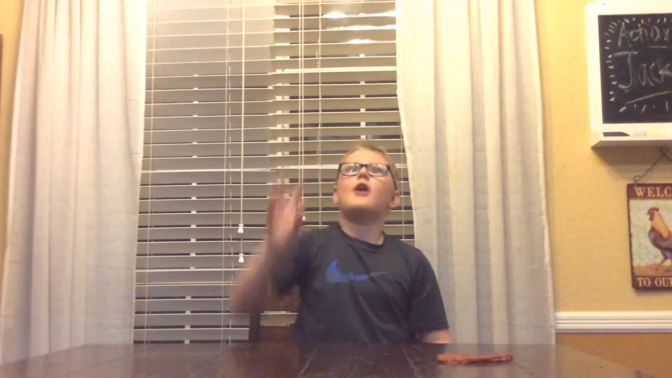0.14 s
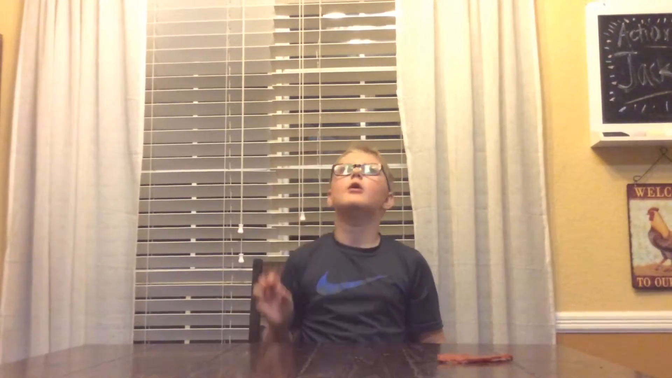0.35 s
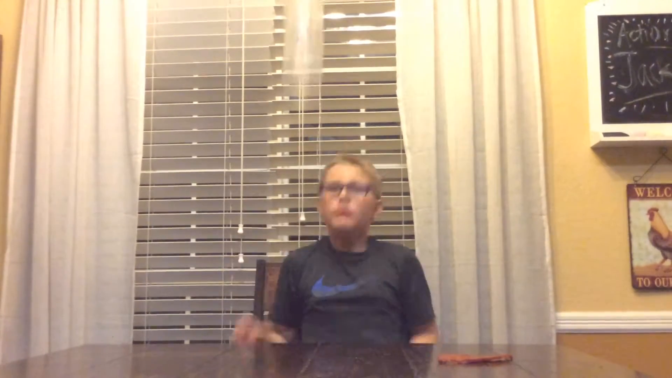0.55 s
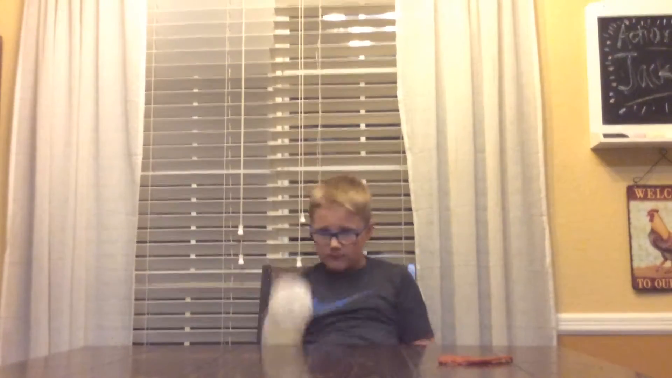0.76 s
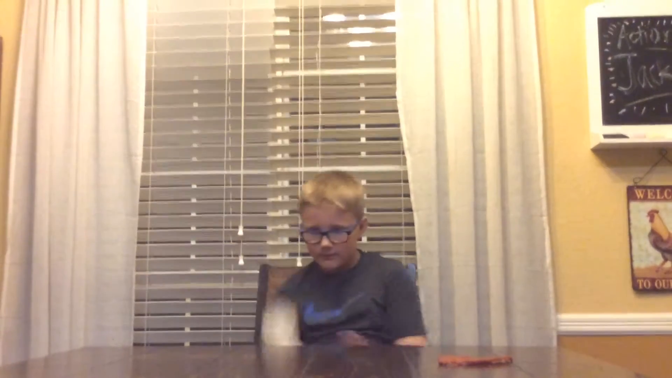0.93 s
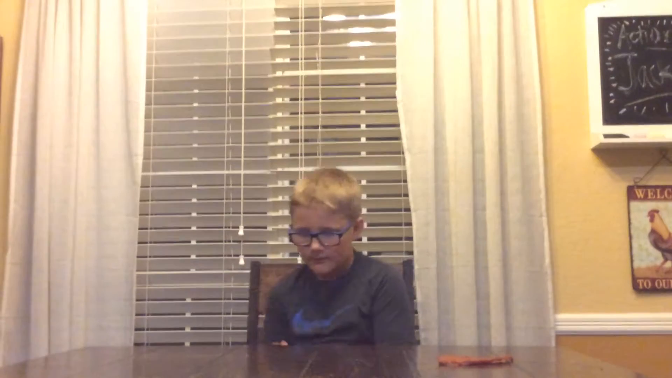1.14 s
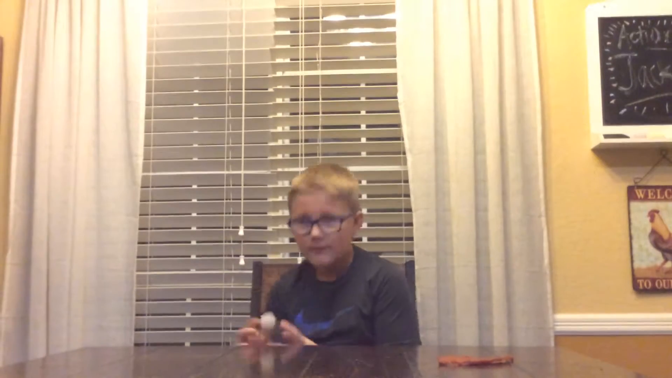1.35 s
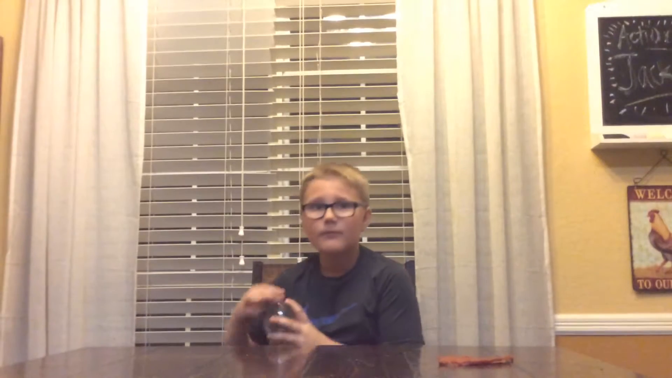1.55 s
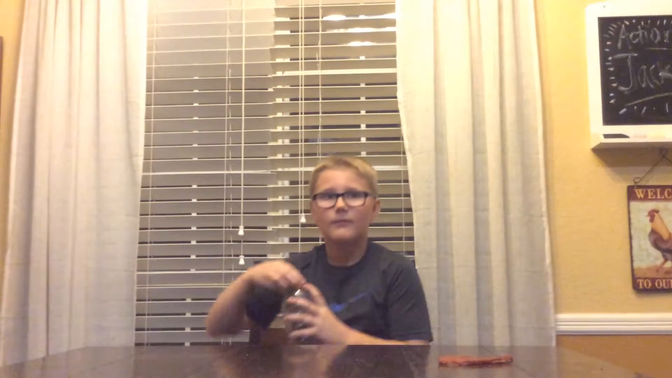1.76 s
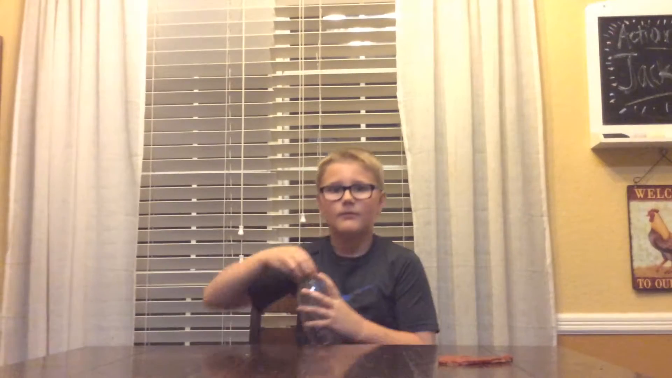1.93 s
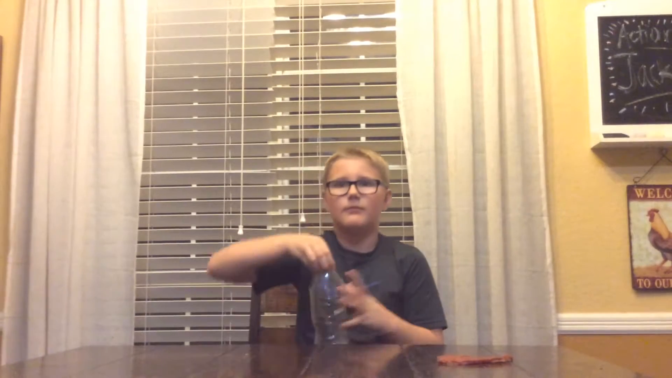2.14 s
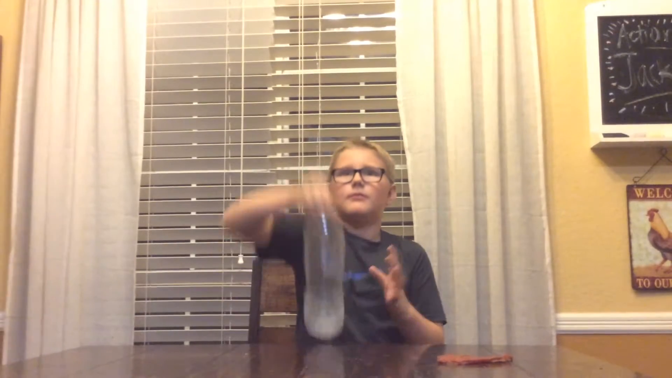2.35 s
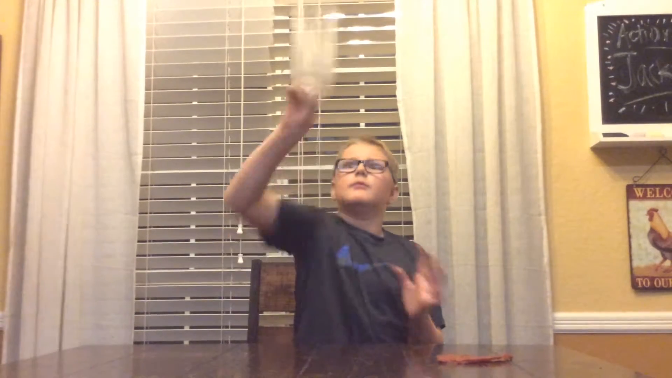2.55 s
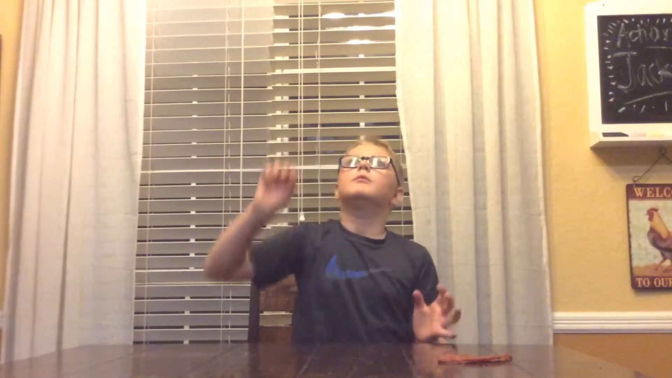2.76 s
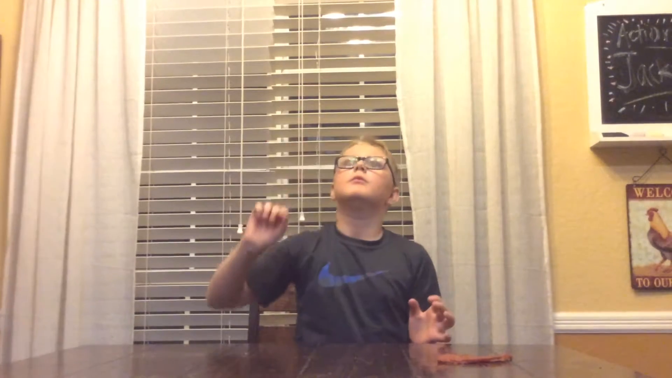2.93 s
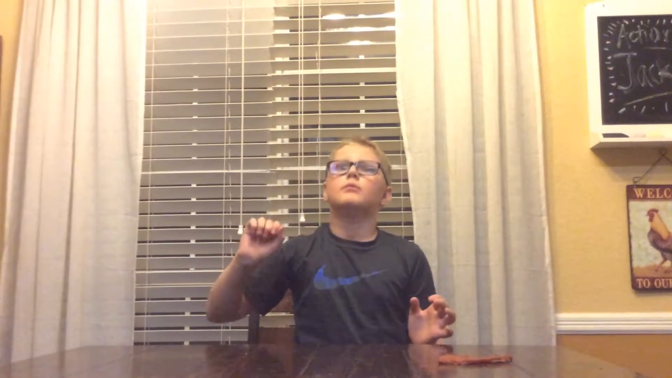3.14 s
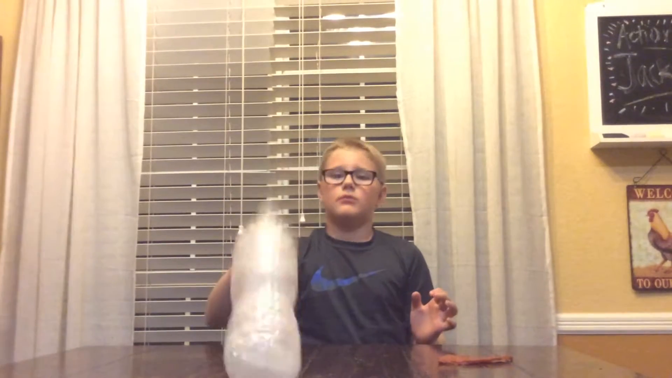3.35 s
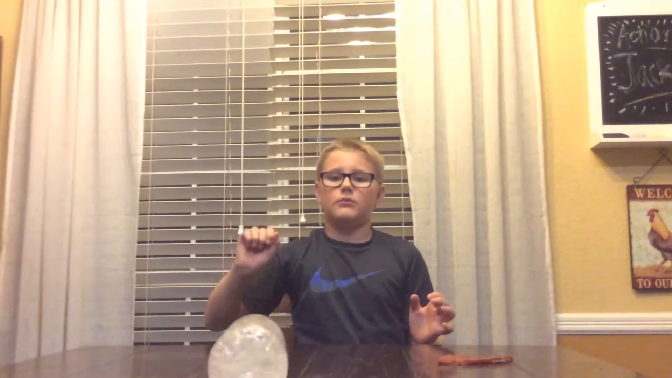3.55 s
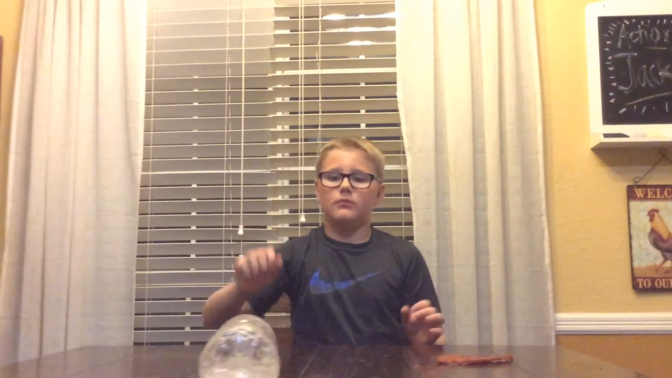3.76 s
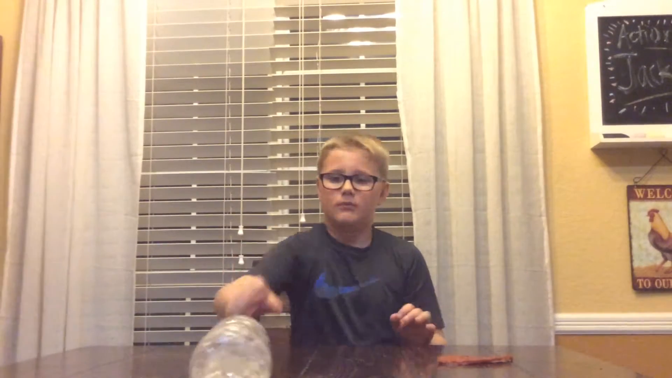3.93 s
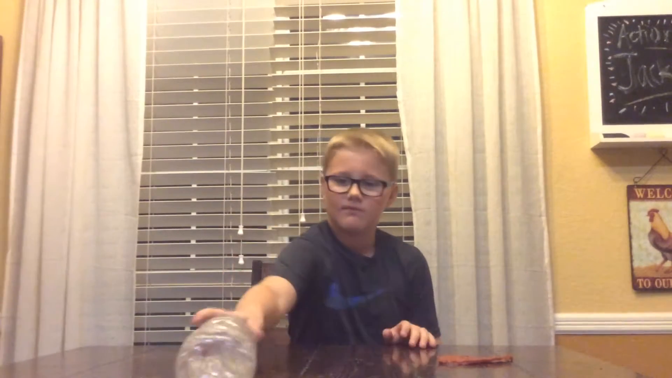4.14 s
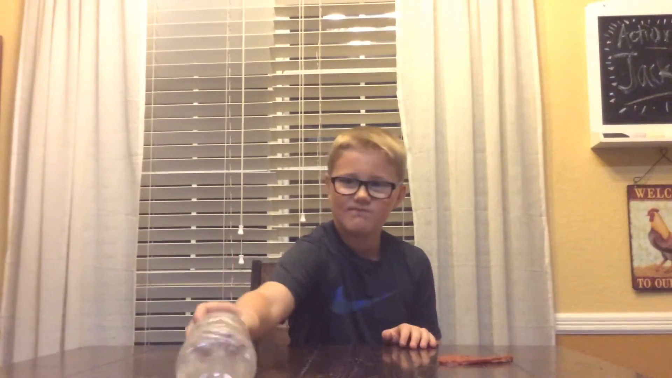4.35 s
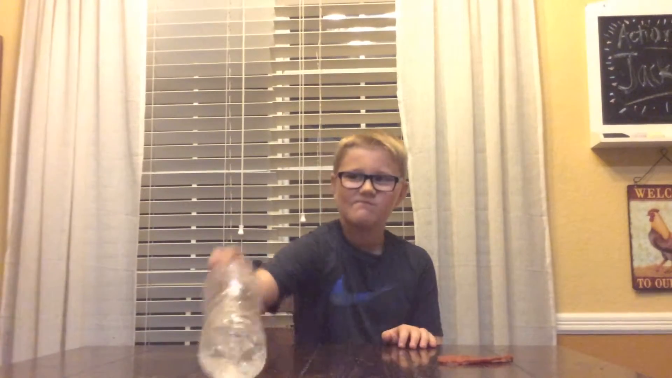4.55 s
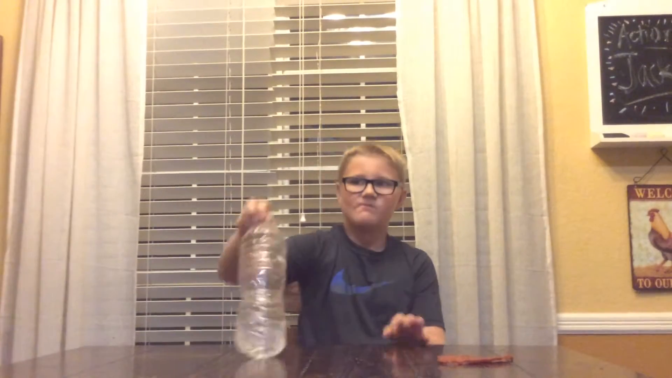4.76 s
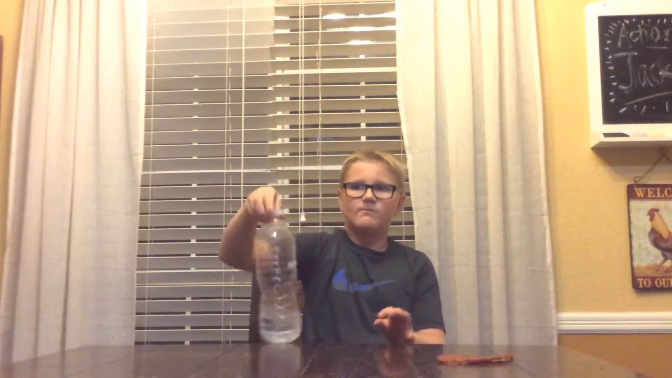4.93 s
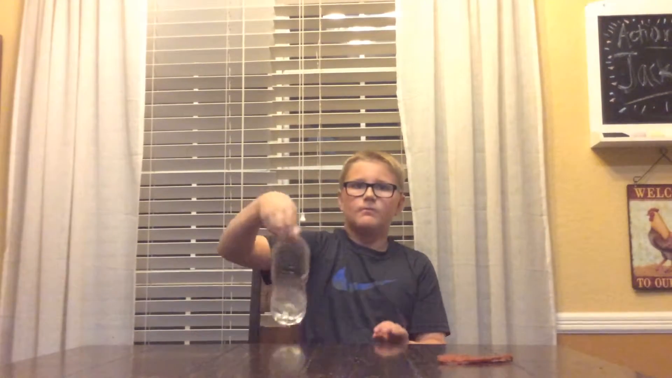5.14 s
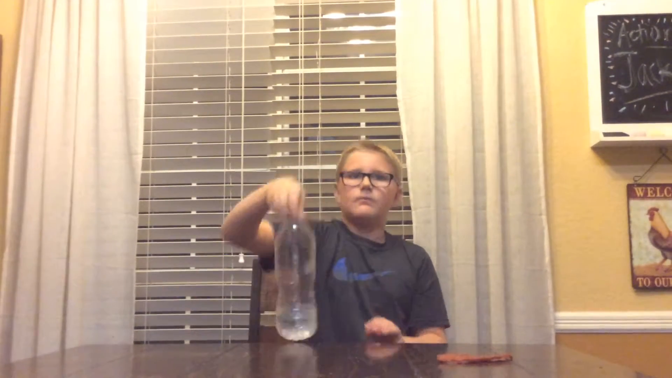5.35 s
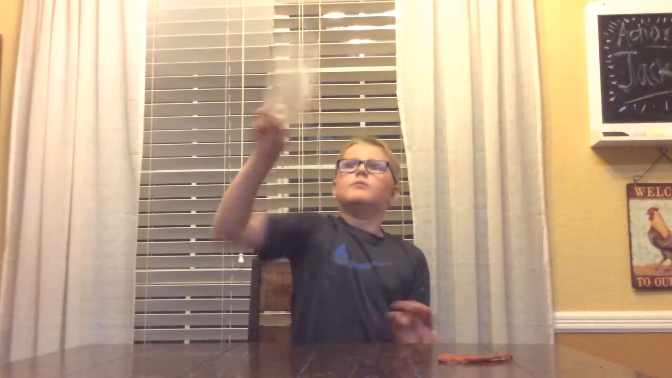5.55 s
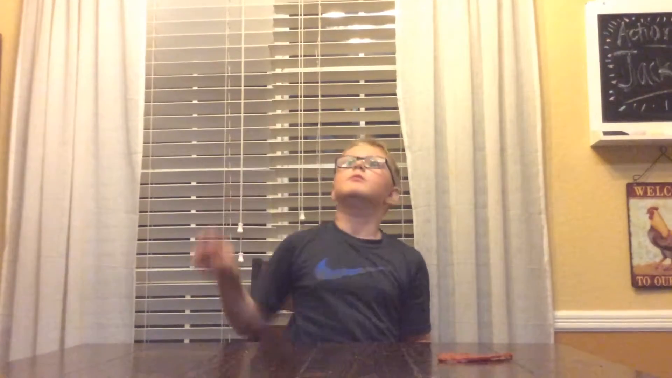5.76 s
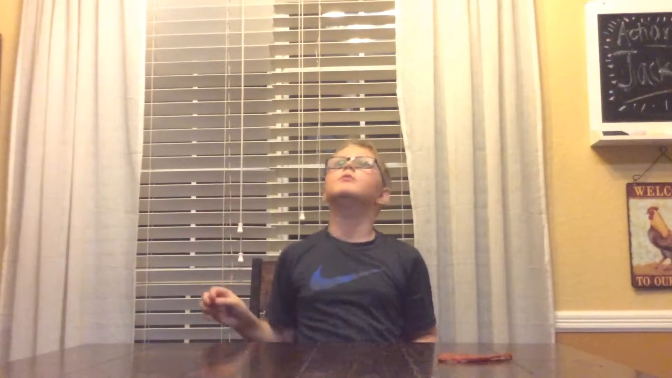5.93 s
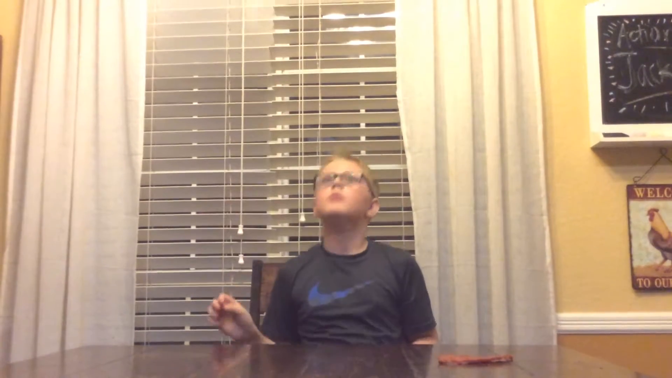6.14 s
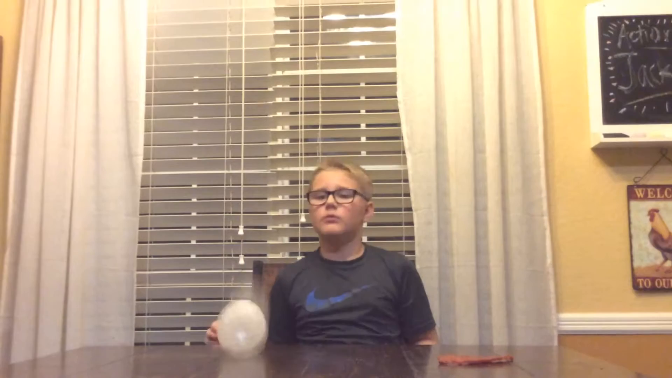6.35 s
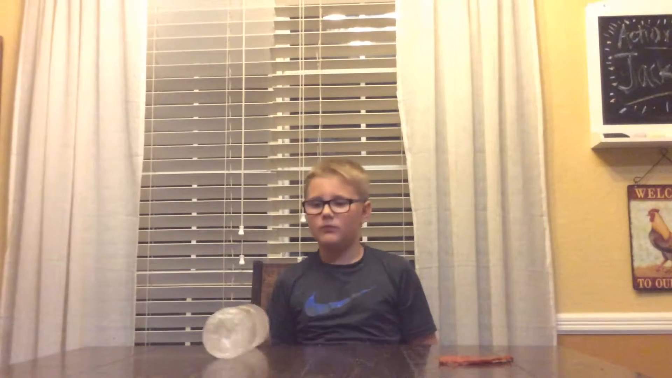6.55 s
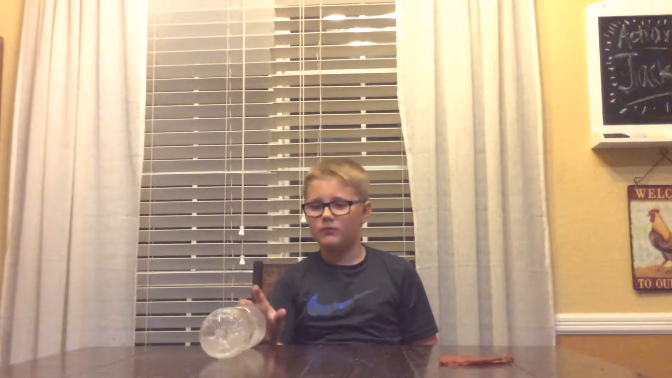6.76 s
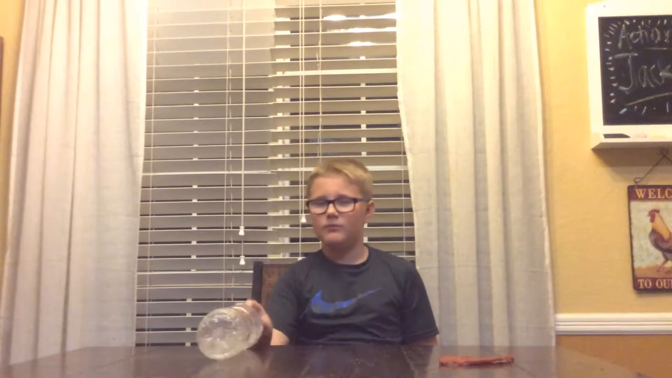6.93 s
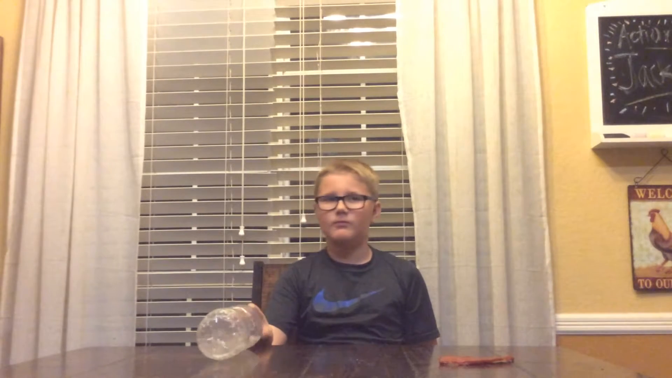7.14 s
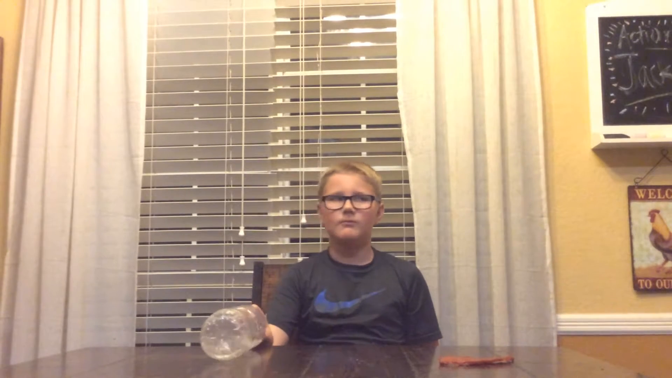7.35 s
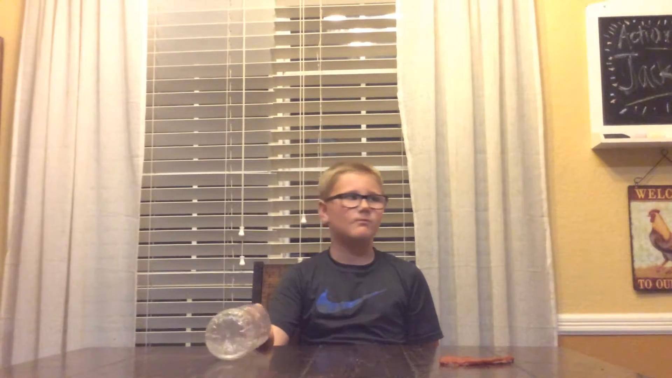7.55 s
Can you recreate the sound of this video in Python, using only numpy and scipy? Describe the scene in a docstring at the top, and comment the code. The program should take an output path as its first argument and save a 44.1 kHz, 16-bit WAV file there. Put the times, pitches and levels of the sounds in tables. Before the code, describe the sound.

Quiet handling and a soft knock, then a partly filled plastic bottle slams onto a wooden table, followed by a smaller bounce and water swish. After a quiet pause, a second hard slam and rebound, then plastic crinkling, a gulp and a dull set-down. A third crackling slam ends the flips, leaving faint rustle and hum. Nearby microphone, small indoor room, brief reverberation.

```python
"""Flipping a water bottle

A partly filled plastic bottle is flipped three times over a wooden table in a furnished room, lands with
a thud, bounces, is picked up and set down. Pushes and clicks ring the modes of table and wall; shaped noise
and short ringing drops make rumble, slosh and rustle; crackles snap and gliding sines gulp.
Decaying noise in bands is the room, over a steady noise hum."""
import sys
import numpy as np
from scipy import signal
from scipy.fft import rfft, irfft, next_fast_len
from scipy.io import wavfile

SR = 44100
rng = np.random.default_rng(int(sys.argv[2]) if len(sys.argv) > 2 else 0)


def waveform_to_disk(signal):
    """Save audio, clipped to [-1, 1], as 16-bit WAV at the path in sys.argv[1]."""
    frames = np.transpose(np.atleast_2d(signal))
    scaled = np.clip(frames, -1, 1) * 32767
    samples = np.round(scaled).astype(np.int16)
    wavfile.write(sys.argv[1], SR, samples)


N = 339129

# steady room hum: (frequency [Hz], relative density [dB per Hz])
HUM_SPECTRUM = [(15, -35.5), (25, -15.5), (75, 1.5), (125, 4), (221, -7), (297, -18.5), (421, -12),
                (2480, -31), (3520, -31), (7080, -32), (9260, -30), (12800, -43.5), (15400, -53)]
HUM_DB = -64  # rms

# movements of hand, bottle and water, each swelling to a peak and dying away:
# (peak time [s], rise over 20 dB [s], fall over 20 dB [s],
#  rumble of arms and chair [dB], sloshing water [dB], fine spray and rustle [dB])
MOVES = [(0.052, 0.017, 0.025, -48.5, -54, -57), (0.2, 0.15, .06, -67, -77, -69.5),
         (0.28, 0.11, 0.35, -77, -81, -63), (0.413, 0.1, 0.097, -59, -61.5, -60),
         (0.58, .012, 0.06, -54, -50.5, -44), (0.605, 0.039, 0.06, -45.5, -52.5, -48.5),
         (0.72, .15, .15, -56, -53.5, -62.5), (1.063, 0.02, .07, -47, -37, -58),
         (1.13, 0.041, 0.097, -41, -35.5, -36), (1.289, .1, 0.21, -65.5, -58, -65),
         (1.665, 0.15, 0.21, -59, -59, -66), (1.53, .02, 0.14, -72, -65.5, -75),
         (1.88, 0.07, 0.11, -58.5, -64.5, -78.5), (2.08, .12, 0.1, -80, -63, -67.5),
         (2.235, 0.038, 0.065, -67.5, -67.5, -69.5), (2.591, .025, 0.085, -50, -55, -62.5),
         (2.77, 0.069, 0.21, -66.5, -71, -67.5), (2.941, 0.048, 0.19, -78, -68, -70),
         (3.7, 0.12, 0.19, -56.5, -52.5, -74.5), (4.059, 0.059, .15, -57.5, -73, -86.5),
         (4.22, .02, .03, -56.5, -60, -84), (4.265, 0.012, .12, -61.5, -58, -62.5),
         (4.3, .04, 0.073, -50, -61.5, -72.5), (4.39, 0.044, 0.13, -47.5, -64, -74),
         (4.49, 0.12, 0.28, -64, -56.5, -64), (4.61, 0.11, 0.22, -73, -50.5, -66),
         (4.764, 0.08, 0.057, -37.5, -37.5, -63), (4.85, 0.021, 0.1, -51, -46, -70.5),
         (4.91, 0.07, 0.072, -47, -47.5, -68), (4.97, 0.0091, 0.041, -37, -58.5, -64),
         (5.26, 0.018, 0.0986, -61, -76, -78.5), (5.315, 0.013, 0.25, -68, -67, -88),
         (5.45, .1, 0.13, -62.5, -72, -96), (5.609, 0.021, 0.034, -61, -53.5, -66.5),
         (5.749, 0.028, 0.15, -54.5, -72, -69), (5.89, .015, 0.19, -70.5, -66, -62),
         (5.945, 0.065, .13, -64, -59, -65.5), (6.192, 0.038, 0.27, -71.5, -66, -85.5),
         (6.24, 0.068, 0.061, -51.5, -68, -88), (6.341, 0.094, 0.18, -49, -62, -75),
         (6.6, .1, 0.22, -61.5, -53, -74), (6.85, .1, .1, -63, -83, -79),
         (6.994, 0.055, .13, -60.5, -60, -76), (7.25, .05, 0.063, -73, -66.5, -86),
         (7.527, .03, .2, -68.5, -74.5, -78.5), (7.68, 0.073, 0.075, -66.5, -63.5, -72)]
# floor between movements: (rumble [dB], slosh [dB], rustle [dB])
FIDGET_DB = (-71, -82, -92.5)
FIDGET_SWING_DB, FIDGET_RATE_HZ = 2.5, 2.7
BUBBLE_CYCLES = 6  # cycles for a bubble to fall 60 dB
# fine spray: (frequency [Hz], relative density [dB per Hz])
SPRAY_SPECTRUM = [(1060, -30.5), (1800, -2), (2340, -7.5), (3010, -6.5), (3700, 1), (4380, -7.5),
                  (5950, 2.5), (7000, -13), (8380, -5.5), (15400, -47)]

# room decay: (frequency [Hz], t60 [s])
ROOM_T60 = [(60, 1), (250, 0.24), (1000, 0.37), (3000, 0.32), (8000, 0.33), (14000, 0.067)]
# room level: (frequency [Hz], reverberation level [dB])
ROOM_DB = [(60, -21.5), (250, -6.5), (1000, -5), (3000, -2), (8000, -3.5), (14000, -11)]
LATE_TAIL_DB, LATE_TAIL_STRETCH = -20, 2.2  # weaker, slower decay from adjoining spaces

# soft low hollow knocks: (time [s], peak [dB], pitch [Hz])
KNOCKS = [(0.049, -46.5, 189), (2.593, -44.5, 214.9), (5.6, -47.5, 210.3), (5.756, -55, 176.7),
          (6.215, -56.5, 231.3), (6.238, -57, 167.2), (6.305, -50, 181)]
KNOCK_SWELL_T60_S, KNOCK_T60_S = 0.06, 0.26

# single snaps of the plastic wall: (time [s], level [dB], pitch [Hz])
SNAPS = [(0.416, -46, 890), (0.783, -1.5, 1565), (1.062, -20.5, 1720), (1.094, -31, 2150),
         (1.135, -25, 895), (1.637, -60.5, 5500), (1.67, -58.5, 2800), (1.946, -51.5, 700),
         (1.988, -61, 3900), (2.08, -57.5, 4600), (2.24, -64, 3090), (2.73, -43.5, 3640),
         (2.878, -56.5, 2745), (2.906, -50.5, 5900), (2.94, -57.5, 1665), (3.361, -2.5, 995),
         (3.532, -11.5, 1220), (4.051, -56.5, 1004), (4.259, -50, 1580), (4.602, -56, 5540),
         (4.654, -31.5, 1130), (4.699, -29.5, 1290), (4.727, -27.5, 1070), (4.799, -33.5, 1250),
         (4.896, -38.5, 790), (5.257, -51, 1500), (5.728, -50.5, 3630), (5.747, -45, 3940),
         (5.869, -53, 3820), (5.885, -48, 3190), (5.926, -39.5, 3780), (5.944, -32.5, 3130),
         (6.394, -18, 1110), (7.01, -55, 773), (7.25, -49.5, 771)]
SNAP_CYCLES = 21.0  # cycles for the main ring to fall 60 dB
CRACKLE_S = 0.002  # decay time constant

# bottle on table: (time [s], blow level [dB], then relative to it: table frame [dB], table boom [dB],
#  table wood [dB], bottle wall [dB], splash [dB]; crumpling time constant [ms],
#  brightness [dB per octave]; relative again: hollow note [dB], after-ring [dB])
BLOWS = [(0.55, -55, -28, -27.5, 5, 3, -25, 4.2, -1.3, -25, -30),
         (0.78, 4.5, -32.5, -21, -26, -22, -22.5, 9.3, -3, -28, -34.5),
         (0.788, -1, -37, -29.5, -7.5, -14, -28.5, 15, -1.3, -9, -35.5),
         (1.062, -17.5, -37, -36, -33, -21, -20.5, 18.6, -0.7, -19.5, -35),
         (3.355, -7.5, -23.5, -22, 0, -10.5, -14, 14.3, -0.74, -22, -21),
         (3.362, 3, -18, -19.5, -31.5, -19, -31.5, 11.6, -1.2, -36.5, -18),
         (3.534, -10.5, -23.5, -13.5, -9.5, -12.5, -13, 13.8, 1, -17.5, -13.5),
         (4.372, -43, -33, -25, -35, -1, -20.5, 7.2, -1.1, -25, -25),
         (4.493, -44, -17, -7, -6, -5, -28, 26, -0.62, -22, -15),
         (4.964, -36, -29, -7, -19, -12.5, -40, 5.6, -1.46, -18, -21),
         (4.976, -39.5, -11, 0, -8.5, -28, -42, 6.7, -1.6, -13, -8.5),
         (6.393, 3, -32.5, -30, -15.5, -11.5, -24, 11.3, -0.38, -23.5, -22.5),
         (6.401, -4, -31.5, -22, -6.5, -11.5, -20.5, 23, -2.9, -10.5, -19),
         (6.426, -5.5, -33.5, -20, -17.5, -17.5, -18.5, 11.7, 0.2, -16, -19.5)]
# table swaying on its legs: (frequency [Hz], level [dB], t60 [s])
FRAME = [(41, -8, 0.57), (71, 0.5, 0.85)]
# table top as a whole: (frequency [Hz], level [dB], t60 [s])
BOOM = [(92.4, 0.5, .7)]
# wood modes of the table: (frequency [Hz], level [dB], t60 [s])
WOOD = [(129, 1, 0.065), (155.8, -1, 0.17), (217.5, -3, 0.11), (250, -2.5, 0.074), (300, -6, 0.07),
        (392, -3.5, 0.026), (450, 0.5, .05), (528, -1, 0.06)]
# bottle wall modes: (frequency [Hz], level [dB], t60 before the limit below [s])
WALL = [(666, 2.5, 0.027), (836, 0.5, 0.024), (1066, 3, 0.02), (1266, 1.5, 0.012), (1599, -3.5, 0.06),
        (1897, -0.5, 0.01), (2220, -5.5, 0.015), (3290, -5, 0.013)]
LONGEST_WALL_T60_S = 0.035
# a hollow note that some landings wake, perhaps the air in the bottle:
# (frequency [Hz], level [dB], t60 [s])
HOLLOW = [(325.5, 4, 0.24)]
# a faint ring outlasts hard blows: (frequency [Hz], level [dB], t60 [s])
AFTER_RING = [(1222, -45, 1.8), (1260, -48, 1.4), (1292, -46, 1.6), (1357, -46, 2.2), (1366, -45, 2.2),
              (1443, -47, 1.4)]
# water thrown about by a blow: (frequency [Hz], relative density [dB per Hz])
SPLASH_SPECTRUM = [(880, -32), (1500, -2.5), (2170, -12), (2490, -10.5), (3750, -7), (4430, -13.5),
                   (5650, -6), (6870, -16), (8350, -16), (15400, -59.5)]

# water gulps as the bottle is tipped or held:
# (time [s], peak [dB], start pitch [Hz], end pitch [Hz], length [s])
GULPS = [(4.737, -43.5, 1494, 347.5, .055), (4.796, -51, 3000, 2480, 0.0173),
         (4.889, -35.5, 287, 330, 0.021), (6.958, -63.5, 705, 792, .04), (6.988, -67, 1705, 1766, 0.025),
         (7.231, -57, 760, 790, 0.042)]

CUTOFF_HZ = 15600  # 70 dB down from here up


def from_db(db):
    """Decibels to gain."""
    return 10 ** (np.asarray(db) / 20)


def rms_one(x):
    """Scale to unit power."""
    return x / np.sqrt(np.mean(x ** 2) + 1e-20)


def at_hz(points, hz):
    """Read a curve on a log-frequency axis."""
    curve = np.array(points)
    return np.interp(np.log(np.maximum(hz, 1)), np.log(curve[:, 0]), curve[:, 1])


def colour(x, spectrum):
    """Shape white noise or grains by a spectrum; rms 1."""
    size = next_fast_len(N)
    gain = from_db(at_hz(spectrum, np.fft.rfftfreq(size, 1 / SR)))
    return rms_one(irfft(rfft(x, size) * gain, size)[:N])


def band(kind, hz, x):
    """Second-order Butterworth filter."""
    return signal.sosfilt(signal.butter(2, hz, kind, fs=SR, output="sos"), x)


def ring(force, hz, t60):
    """A damped resonance: a unit click sets a decaying sine of starting height 1 ringing."""
    r, w = from_db(-60 / (t60 * SR)), 2 * np.pi * hz / SR
    return signal.lfilter([0, np.sin(w)], [1, -2 * r * np.cos(w), r * r], force + 1e-18)


def strike(force, modes, tilt_db=0., longest_s=np.inf):
    """One force rings every mode of a body, signs alternating; tilt in dB per octave about the middle mode."""
    middle_hz = modes[len(modes) // 2][0]
    out = 0
    for k, (hz, db, t60) in enumerate(modes):
        gain = from_db(db + tilt_db * np.log2(hz / middle_hz))
        out = out + (-1) ** k * gain * ring(force, hz, min(t60, longest_s))
    return out


def grains(per_s, spread_db):
    """Random clicks of uneven size and sign."""
    sizes = from_db(spread_db * np.minimum(rng.exponential(1, N), 5))
    signs = rng.choice([-1, 1], N)
    return sizes * signs * (rng.random(N) < per_s / SR)


def drift(rate_hz):
    """Slow chance: noise at every 40th sample through a double one-pole low-pass; rms 1."""
    r = np.exp(-2 * np.pi * rate_hz * 40 / SR)
    noise = rng.standard_normal(N // 40 + 2002)
    slow = signal.lfilter([1], [1, -2 * r, r * r], noise)[2000:]  # skip the filter's start
    return np.interp(np.arange(N) / 40, np.arange(len(slow)), rms_one(slow))


def add(track, s, sound):
    """Mix a sound into the track at s seconds."""
    i = round(s * SR)
    track[..., i:i + sound.shape[-1]] += sound


def hum():
    """Steady room hum: noise shaped by a mostly low spectrum."""
    return from_db(HUM_DB) * colour(rng.standard_normal(N), HUM_SPECTRUM)


def movement_gains():
    """Gains of rumble, slosh and rustle: a drifting floor plus the power of each movement's swell."""
    t = np.arange(N) / SR
    swing = FIDGET_SWING_DB * np.array([drift(FIDGET_RATE_HZ) for _ in FIDGET_DB])
    power = from_db(np.array(FIDGET_DB)[:, None] + swing) ** 2
    for s, rise_s, fall_s, *levels_db in MOVES:
        away = np.maximum((s - t) / rise_s, (t - s) / fall_s)
        swell = from_db(-20 * np.minimum(away, 10))
        power = power + np.outer(from_db(levels_db) ** 2, swell ** 2)
    return np.sqrt(power)


def rumble():
    """Arms and chair: low noise, 70 to 300 Hz; rms 1."""
    return rms_one(band("band", [70, 300], rng.standard_normal(N)))


def slosh():
    """Water: random drops ring short bubbles at 16 pitches over three and a half octaves; rms 1."""
    drops, dealt = grains(2400, spread_db=2.5), rng.integers(0, 16, N)
    out = np.zeros(N)
    for k, hz in enumerate(np.geomspace(320, 3600, num=16)):
        flicker = from_db(3.1 * np.clip(drift(17), -2, 2))
        out += ring(drops * (dealt == k) * flicker, hz, BUBBLE_CYCLES / hz) / hz ** 0.33
    return rms_one(out)


def spray():
    """Fine spray and rustle: clicks whose strength drifts, so droplets come in clumps; rms 1."""
    clumps = from_db(3 * drift(40))
    return colour(grains(6400, spread_db=3.0) * clumps, SPRAY_SPECTRUM)


def handling():
    """Every movement sets its own balance of rumble, slosh and spray."""
    return np.sum(movement_gains() * [rumble(), slosh(), spray()], axis=0)


def room(x):
    """Diffuse field by third octaves: sound energy is stored, leaks away by the t60 and is heard as noise."""
    edges, out = 45 * 2 ** (np.arange(26) / 3), 0
    white = rng.standard_normal((2, N))
    for k, (low, high) in enumerate(zip(edges, edges[1:])):
        hz = np.sqrt(low * high)
        fed, noise = band("band", [low, high], [x, white[k % 2]])
        keep = from_db(-120 / (at_hz(ROOM_T60, hz) * SR))  # energy kept per sample: 60 dB of power per t60
        energy = signal.lfilter([1 - keep], [1, -keep], fed ** 2 + 1e-18)
        keep_late = keep ** (1 / LATE_TAIL_STRETCH)
        late = signal.lfilter([1 - keep_late], [1, -keep_late], energy)
        energy = energy + from_db(LATE_TAIL_DB) ** 2 * late
        out = out + from_db(at_hz(ROOM_DB, hz)) * np.sqrt(energy) * rms_one(noise)
    return out


def knocks():
    """Soft low hollow knocks: two resonances at one pitch in a row make a ring swell before it decays."""
    out, click = np.zeros(N), np.eye(1, SR // 4)[0]
    for s, db, hz in KNOCKS:
        knock = ring(ring(click, hz, KNOCK_T60_S), hz, KNOCK_SWELL_T60_S)
        add(out, s, from_db(db) * knock / knock.max())
    return out


def snaps():
    """The plastic wall snaps: a short crackle of noise rings one pitch and a weaker one 1.6 times higher."""
    out, t = np.zeros(N), np.arange(SR // 4) / SR
    for s, db, hz in SNAPS:
        crackle = rng.standard_normal(len(t)) * np.exp(-t / CRACKLE_S)
        crackle = band("high", 0.7 * hz, crackle)
        crackle = crackle / np.sqrt(np.sum(crackle ** 2))
        main = ring(crackle, hz, SNAP_CYCLES / hz)
        upper = ring(crackle, 1.6 * hz, 0.55 * SNAP_CYCLES / hz)
        add(out, s, from_db(db) * (main + 0.5 * upper))
    return out


def blows():
    """One push drives the table; the wall buckles in uneven clicks and water splashes as the bottle crumples."""
    t = np.arange(SR // 2) / SR
    push, out = np.eye(1, len(t))[0], np.zeros(N)
    long_bodies = (FRAME, BOOM, HOLLOW, AFTER_RING)
    pushes = np.zeros((len(long_bodies), N))  # whole-length forces, so these can ring on
    buckling = grains(2500, spread_db=3.5)
    splash = colour(rng.standard_normal(N), SPLASH_SPECTRUM)
    for (s, db, frame_db, boom_db, wood_db, wall_db, splash_db,
         crumple_ms, tilt_db, hollow_db, after_db) in BLOWS:
        here = slice(round(s * SR), round(s * SR) + len(t))
        fade = np.exp(-t * 1000 / max(crumple_ms, 1)) * (1 - np.exp(-t / 0.000075))
        clatter = buckling[here] * fade
        clatter = clatter / np.sqrt(np.sum(clatter ** 2) + 1e-9)
        levels_db = db + np.array([[frame_db], [boom_db], [hollow_db], [after_db]])
        add(pushes, s, from_db(levels_db) * push)
        wood = strike(push + 0.65 * clatter, WOOD, tilt_db)
        wall = strike(1.1 * push + clatter, WALL, tilt_db, LONGEST_WALL_T60_S)
        add(out, s, from_db(db + wood_db) * wood)
        add(out, s, from_db(db + wall_db) * wall)
        add(out, s, from_db(db + splash_db) * fade * splash[here])
    return out + sum(strike(force, modes) for force, modes in zip(pushes, long_bodies))


def gulps():
    """Water gulps: short sines that swell, fade and glide in pitch."""
    out = np.zeros(N)
    for s, db, start_hz, end_hz, length_s in GULPS:
        pitch = np.geomspace(start_hz, end_hz, round(length_s * SR))
        tone = np.sin(2 * np.pi * np.cumsum(pitch) / SR)
        add(out, s, from_db(db) * np.hanning(len(pitch)) * tone)
    return out


def scene():
    """Everything at the table, its reverberation and the steady hum."""
    near = handling() + knocks() + snaps() + blows() + gulps()
    return (near + room(near) + hum())[None]


def record(dry):
    """The microphone loses the deepest bass, peaks are rounded, the top is cut."""
    heard = band("high", 30, dry)
    rounded = 1.09 * np.tanh(heard / 1.59)
    return signal.sosfilt(signal.cheby2(12, 70, CUTOFF_HZ, fs=SR, output="sos"), rounded)


dry = scene()
out = record(dry)
waveform_to_disk(out)
```